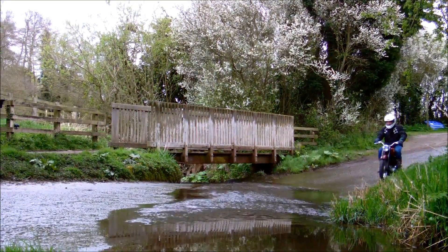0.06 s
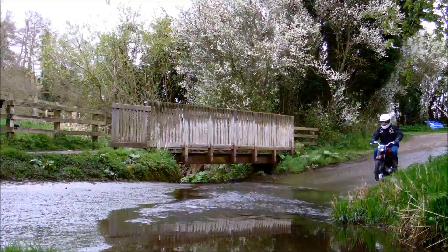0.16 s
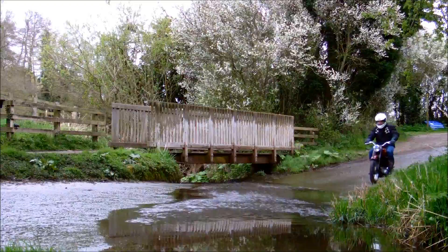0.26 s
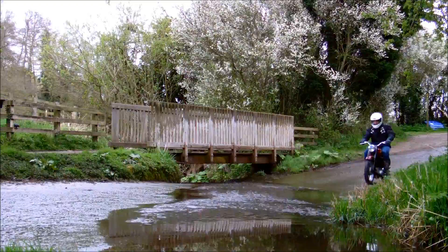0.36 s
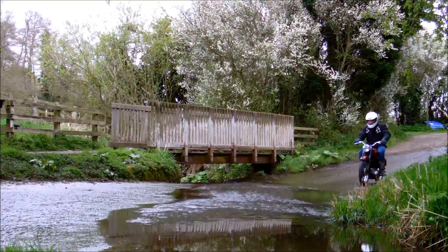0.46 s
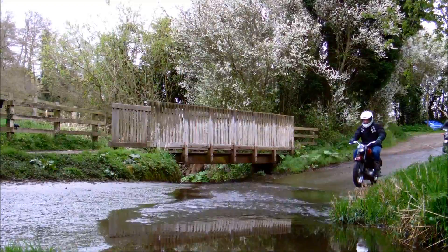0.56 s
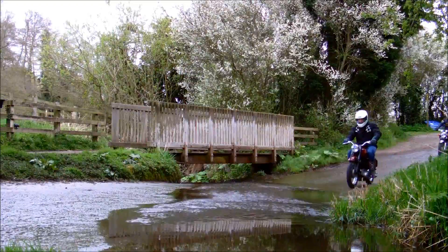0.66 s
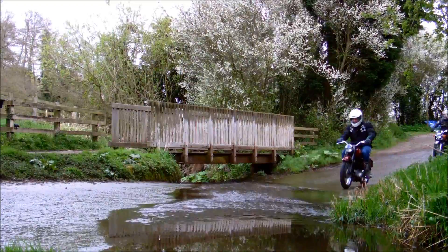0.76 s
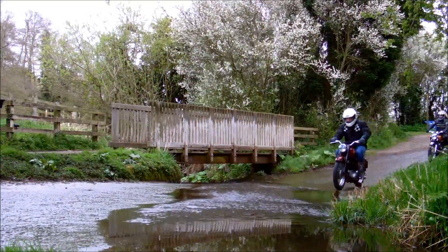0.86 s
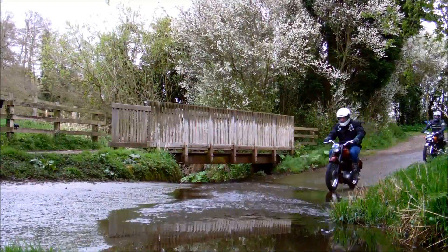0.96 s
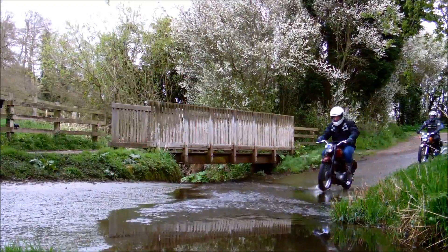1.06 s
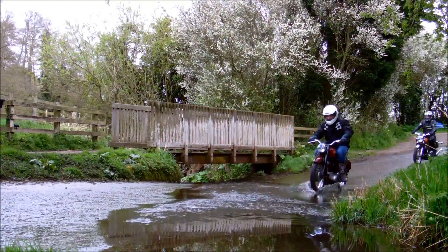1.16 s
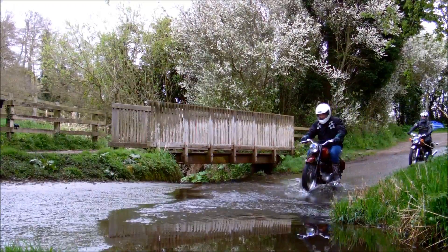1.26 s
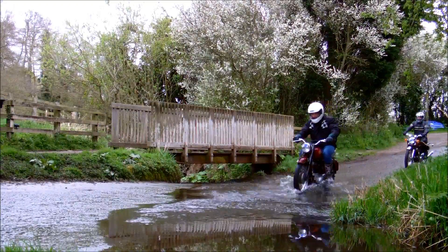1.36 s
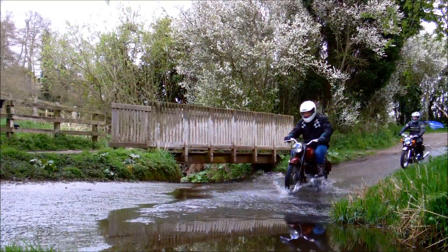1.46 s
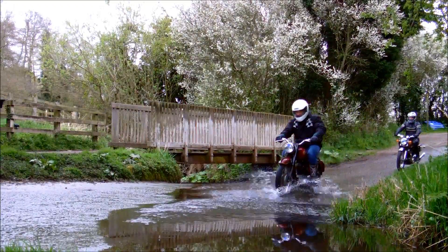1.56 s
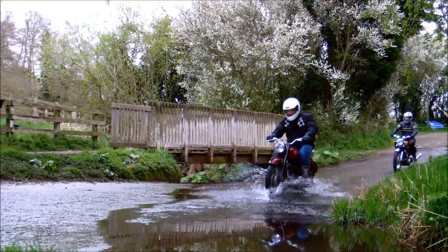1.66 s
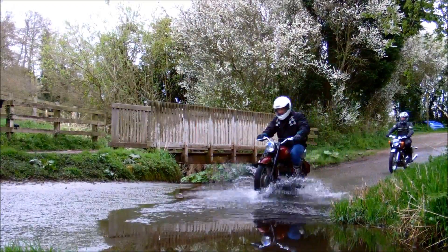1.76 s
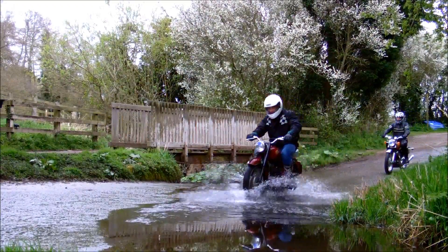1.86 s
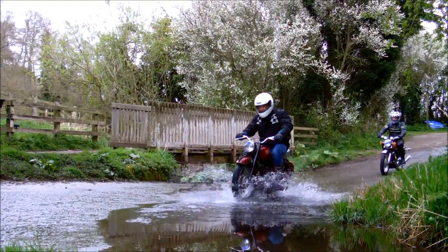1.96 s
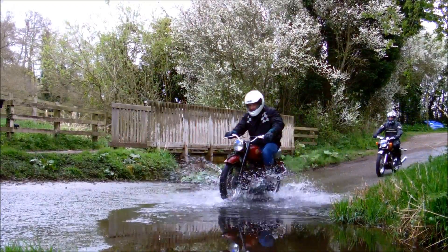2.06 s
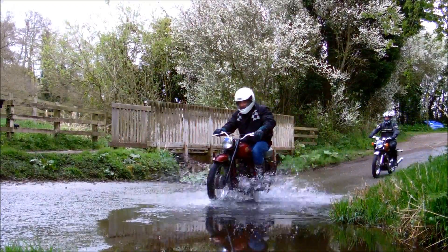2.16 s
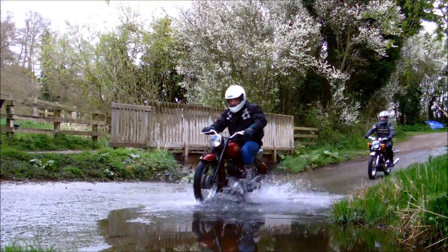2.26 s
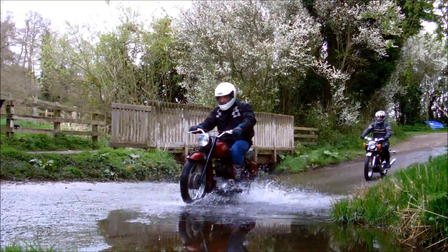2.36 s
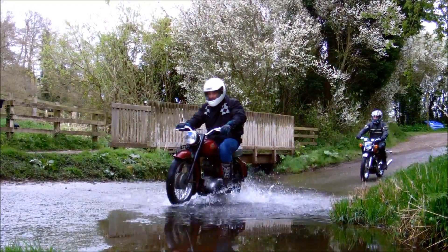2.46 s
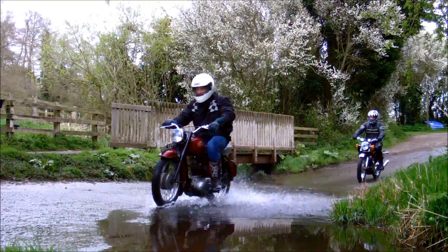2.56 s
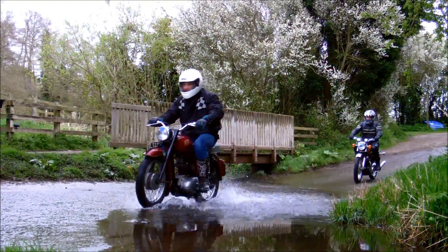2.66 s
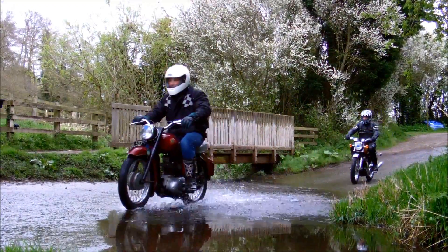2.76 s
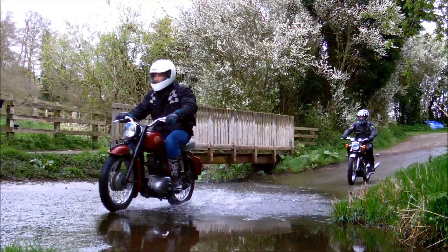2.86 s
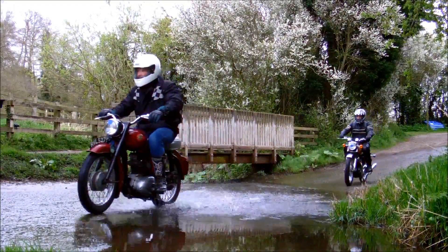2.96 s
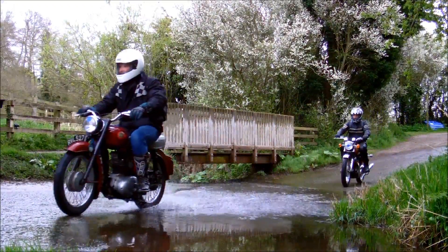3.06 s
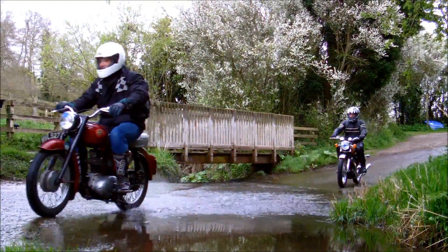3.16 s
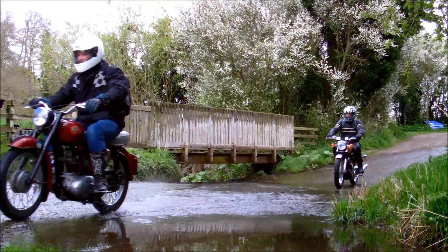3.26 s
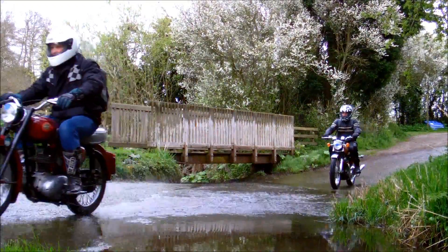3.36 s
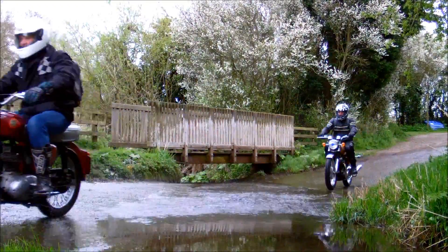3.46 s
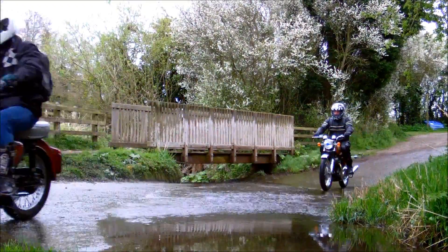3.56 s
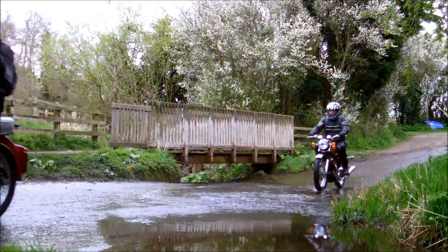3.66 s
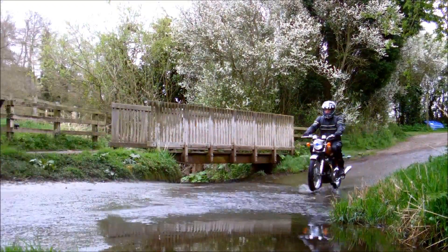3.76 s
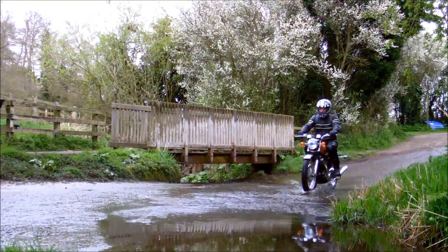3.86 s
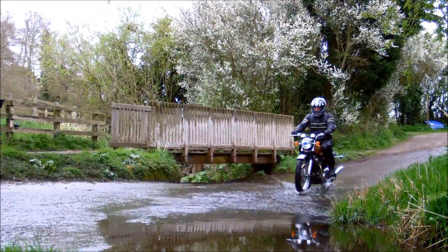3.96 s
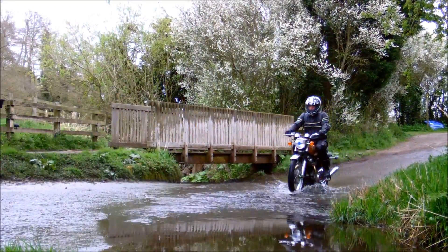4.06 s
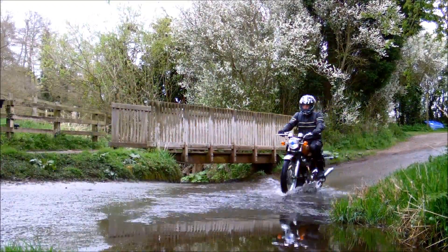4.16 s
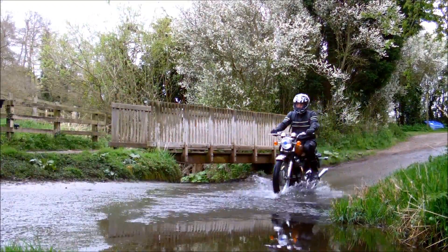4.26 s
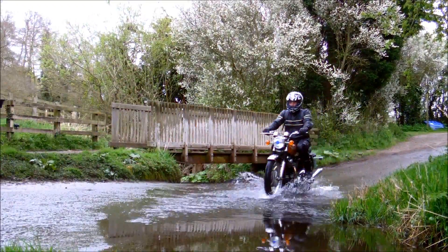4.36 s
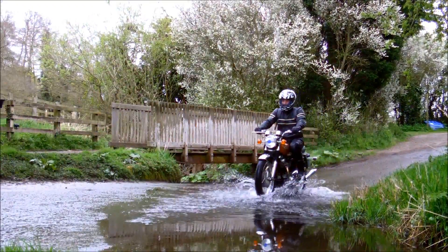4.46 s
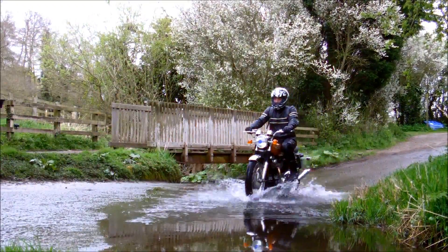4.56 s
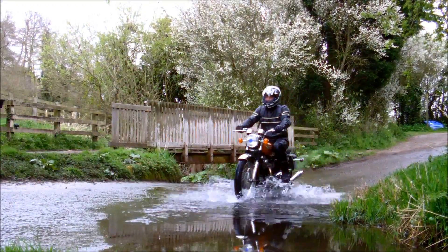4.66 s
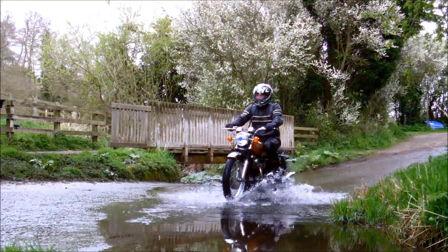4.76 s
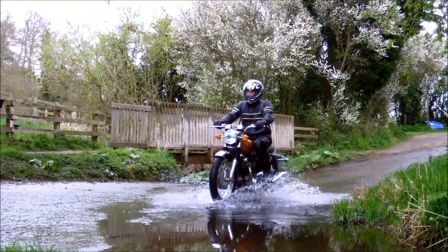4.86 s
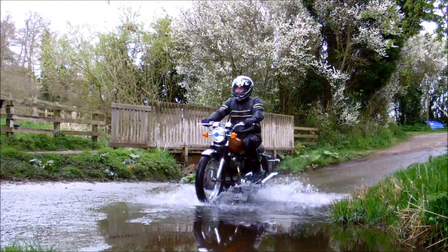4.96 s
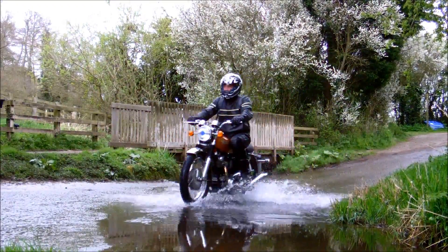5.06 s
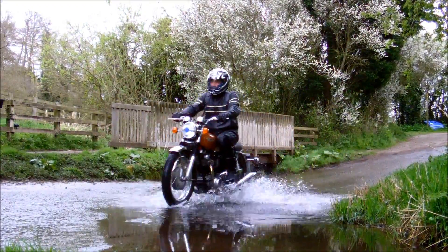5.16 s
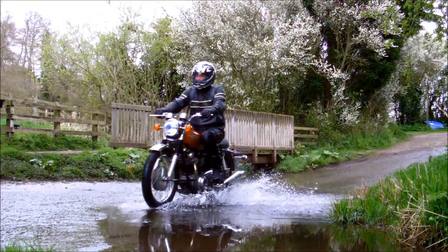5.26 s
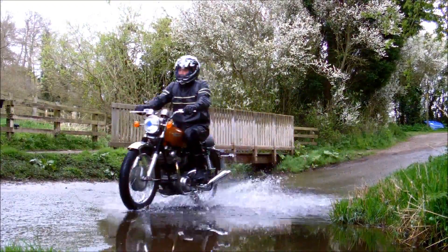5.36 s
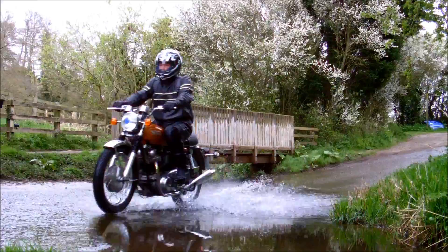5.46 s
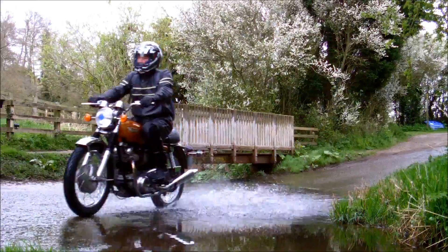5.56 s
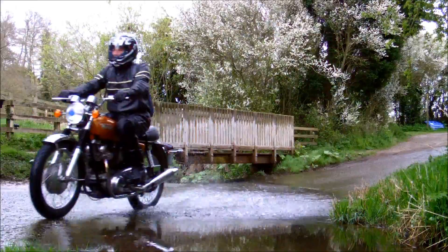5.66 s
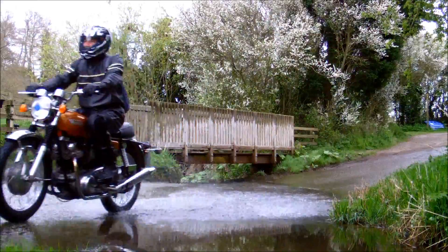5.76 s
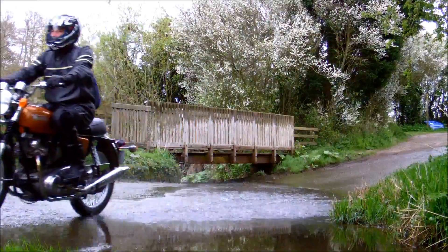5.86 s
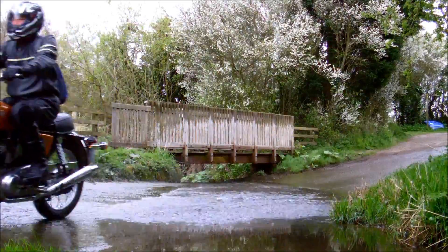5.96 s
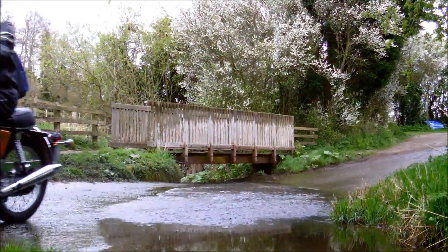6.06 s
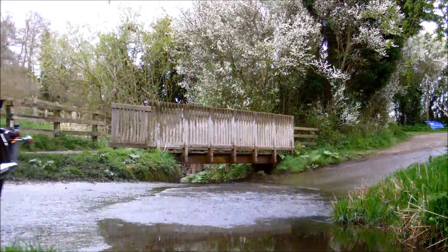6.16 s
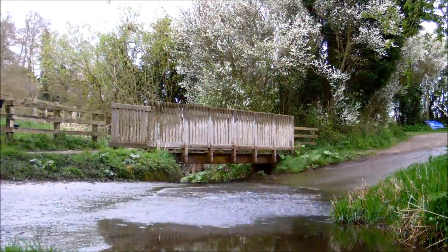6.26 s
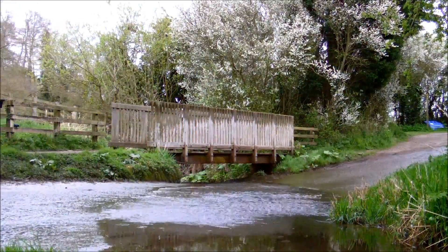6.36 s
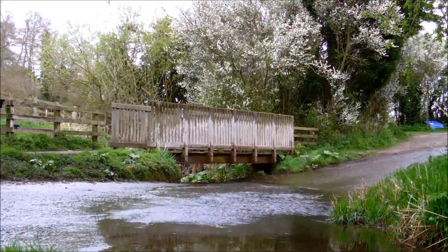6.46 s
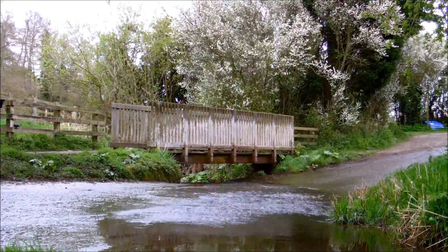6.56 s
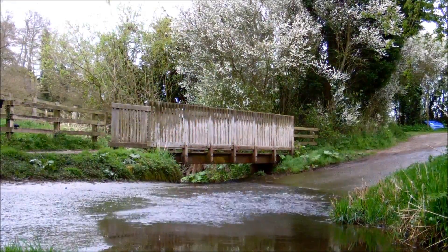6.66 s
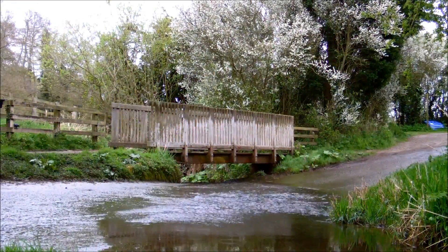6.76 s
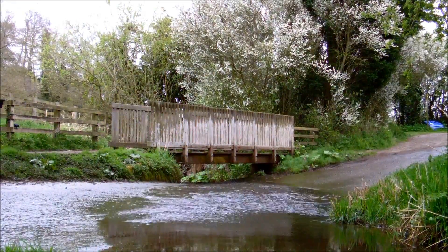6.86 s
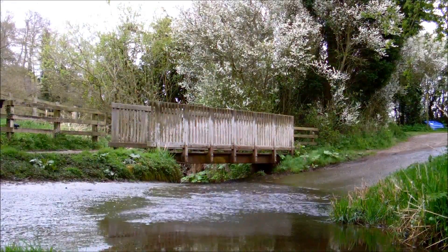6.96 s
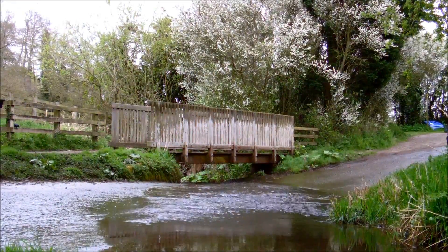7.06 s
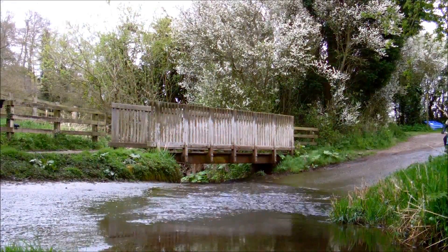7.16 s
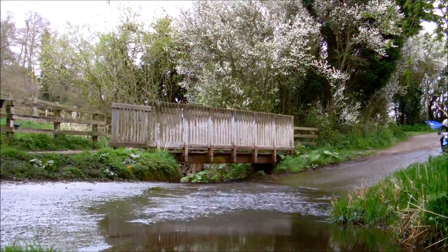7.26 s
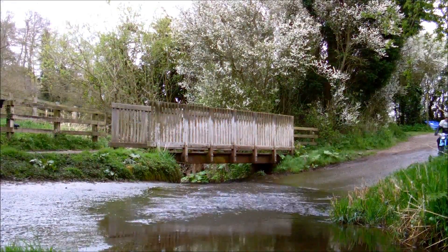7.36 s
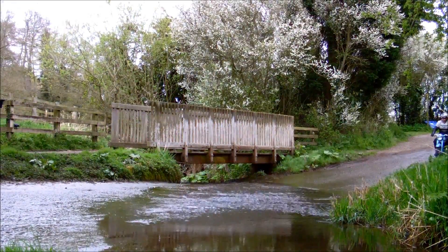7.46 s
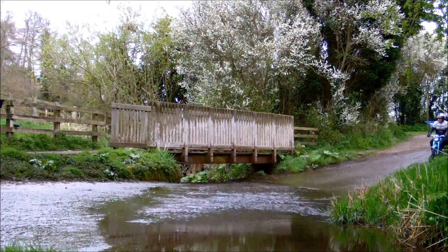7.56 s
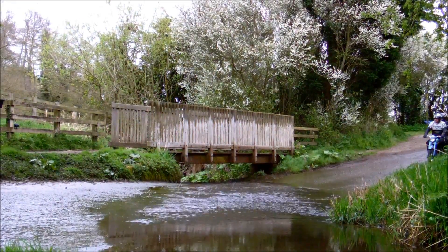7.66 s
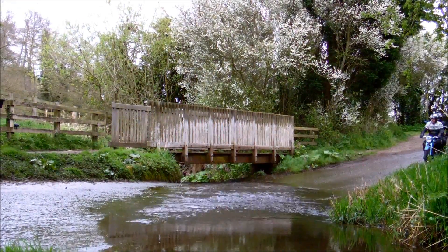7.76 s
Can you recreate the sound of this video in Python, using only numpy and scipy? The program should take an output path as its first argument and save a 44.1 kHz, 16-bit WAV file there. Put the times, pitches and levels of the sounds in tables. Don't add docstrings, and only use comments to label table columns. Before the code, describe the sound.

A shallow stream crossing outdoors, heard through a small, bright, bass-poor microphone. From 0 to 2.5 s, a light water hiss with occasional tiny drop ticks lies over the dry, regular valve rattle of a slow motorcycle approaching head on, about nineteen beats per second, briefly sagging near 2.5 s. Spray swells to its fullest around 3.3-4.5 s. From about 3.1 s the exhaust opens into crisp, fluttering cracks, with ringing casings, a hollow silencer tone and faint gear whine as it passes, speeding up and fading by 6.5 s. A second motorcycle enters at 5 s, slower and harder. Fine mist hisses past near 6.1 s; its uneven, sharp pops peak around 6.3-6.7 s, quicken towards twenty-six beats per second, surge again near 7.4 s, then weaken towards 7.8 s as spray thins. Strong blasts make the background dip momentarily.

```python
import sys
import numpy as np
from scipy import signal
from scipy.fft import rfft, irfft, next_fast_len
from scipy.io import wavfile
from scipy.ndimage import uniform_filter1d

SR = 44100
rng = np.random.default_rng(int(sys.argv[2]) if len(sys.argv) > 2 else 0)


def digitize_waveform(pressure):
    field = np.atleast_2d(pressure).T
    bounded = np.clip(field, -1, 1)
    quanta = np.round(bounded * 32767).astype(np.int16)
    wavfile.write(sys.argv[1], SR, quanta)


def field_ratio(decibels):
    return 10 ** (np.asarray(decibels, dtype=float) / 20)


N = 343980
T = np.arange(N) / SR

# time in seconds, firings per second.
FIRST_SPEED = [(0, 18.89), (.5, 19.17), (.85, 17.87), (1.15, 19.34), (1.5, 18.3), (2.0, 20.21),
               (2.55, 14.88), (3.2, 21.26), (3.8, 20.69), (4.2, 23.04), (5, 24.9), (6.1, 27.47)]
# time in seconds, firings per second.
SECOND_SPEED = [
    (4.9, 15.5),
    (5.5, 19.42),
    (5.75, 19.04),
    (6.0, 20.47),
    (6.3, 20.66),
    (6.6, 22.06),
    (7, 23.36),
    (7.4, 24.99),
    (7.79, 26.06),
]
# time in seconds, sizzle in dB, body in dB, odd cylinder over the mean in dB.
SECOND_CRACK = [
    (5.2, -50, -33, 3),
    (5.4, -44, -17, 1.5),
    (5.7, -24, -16, 2),
    (6.1, -23, -12.5, 1.5),
    (6.35, -22, -14, 9.5),
    (6.55, -12.5, -8.5, 1.5),
    (6.95, -17, -12.5, 4),
    (7.2, -23.5, -17.5, 11),
    (7.45, -16, -15, 4),
    (7.8, -25, -21, 2.5),
]
FIRST_START, SECOND_START = .891, 1.61


def level(x, db):
    return x * field_ratio(db) / np.sqrt(np.mean(x ** 2))


def columns(table):
    s, *cols = np.transpose(table)
    return [np.interp(T, s, c) for c in cols]


def ring(x, modes):
    total = 0
    for k, (hz, width_hz, db) in enumerate(modes):
        b, a = signal.iirpeak(hz, hz / width_hz, SR)
        total = total + (-1) ** k * field_ratio(db) * signal.lfilter(b, a, x)
    return total


def band(x, lo_hz, hi_hz):
    sos = signal.butter(2, [lo_hz, min(hi_hz, .45 * SR)], "band", fs=SR, output="sos")
    return signal.sosfilt(sos, x)


def walk(rate_hz):
    hold = int(SR / rate_hz)
    steps = np.repeat(rng.standard_normal(N // hold + 1), hold)
    return 1.22 * uniform_filter1d(uniform_filter1d(steps, hold), hold)[:N]


def noise():
    return rng.standard_normal(N)


def fade(start_s, end_s):
    return np.clip((T - start_s) / (end_s - start_s), 0, 1)


def crank(table, start):
    turns = np.cumsum(columns(table)[0]) / SR
    return start + turns - turns[int(table[0][0] * SR)]


def beats(turns, scatter_db):
    cycle = np.floor(turns).astype(int) + 2
    size = field_ratio(scatter_db * rng.standard_normal(256))[cycle]
    pulse = size * (np.diff(cycle, prepend=cycle[0]) > 0)
    return pulse, turns % 1, size


def puff(phase, size, width):
    return size * phase / width * np.exp(1 - phase / width)


def first_bike():
    # time in seconds, exhaust in dB, valve rattle in dB.
    loudness = [(0, -70, -41.5), (.25, -79, -36.5), (1.0, -80, -32), (1.3, -80, -38.5), (1.9, -84, -34),
                (2.4, -89, -32), (2.65, -65, -61), (3.0, -57.5, -31), (3.2, -56.5, -32.5),
                (3.9, -55, -29.5), (4.5, -55.5, -49), (5.0, -53.5, -41), (5.4, -60, -33), (5.8, -56, -27),
                (6.2, -58, -24.5)]
    # time in seconds, share of a cycle after the firing.
    valve_lag = [
        (0, 0.33),
        (.35, 0.43),
        (.6, 0.54),
        (1.2, 0.55),
        (2.6, 0.55),
        (6.2, 0.494),
    ]
    # frequency in Hz, width in Hz, level in dB.
    pipe_modes = [(144, 26, 5), (228.7, 20, 0), (90, 40, -15), (252.7, 24, 0)]
    # frequency in Hz, width in Hz, level in dB.
    tail_modes = [(518, 110, 3), (630, 76, 0)]
    # start in seconds, end in seconds, frequency in Hz, width in Hz, level in dB.
    casing = [(.2, 1.3, 4420, 70, -48), (-.3, 1.3, 2880, 60, -55), (-.3, 1.1, 2250, 50, -60),
              (1.2, 2.6, 2880, 140, -45), (1.35, 2.5, 2610, 60, -51), (1.2, 2.45, 1764, 130, -48),
              (2.55, 4.3, 4420, 110, -35), (2.85, 3.7, 2555, 120, -36), (3.0, 3.65, 1150, 28, -44),
              (3.15, 3.85, 3830, 100, -35), (3.85, 4.3, 2620, 80, -35), (3.8, 4.65, 2880, 170, -30),
              (3.9, 4.2, 2270, 66, -44), (4.0, 4.39, 1750, 75.6, -43.5), (4.2, 4.55, 1516, 69, -40),
              (3.76, 4.34, 1020, 86, -41), (4.85, 5.36, 1010, 60, -42), (4.0, 4.7, 4280, 200, -34)]

    turns = crank(FIRST_SPEED, FIRST_START)
    lag, = columns(valve_lag)
    thump_db, rattle_db = columns(loudness)
    pipe_db = thump_db + 16 - 14 * fade(4.23, 4.9)
    off_s = T - 4.4
    off_db = np.where(off_s < 0, 20, -16) * off_s
    silencer_db = np.maximum(-34 + off_db, -85)

    fire, phase, size = beats(turns + .14, scatter_db=.8)
    valve, valve_phase, valve_size = beats(turns + .1 - lag, scatter_db=1.2)
    gate = 0.6 * puff(phase, size, 0.095) + puff(valve_phase, valve_size, 0.094) + 0.49

    thump = level(ring(fire + .2 * valve, pipe_modes), 6)
    pipe = level(ring(valve + 0.46 * fire, [(400, 55, -2.5), (450, 26, -3.5), (554, 140, -21)]), 0)
    gas = level(band(gate * noise(), 340, 600), -12)
    blow = level(fire + 0.31 * valve, 0) + .5 * gate * noise()
    silencer = level(ring(blow, [(789, 123, 1.7), (561, 80, 0.64)]), 1)

    gear = field_ratio(4.7 * walk(25.01)) * np.sin(2 * np.pi * 32 * turns + .6 * walk(60))
    box_gain = 0.22 + np.sin(np.pi * fade(4.06, 4.86))
    silencer = silencer + box_gain * ring(gear, [(788, 76, 1.1)])

    ticks = fade(0.38, 3.3) * puff(phase, size, 0.19) + puff(valve_phase, valve_size, 0.13)
    rattle = band(ticks * field_ratio(2.9 * walk(400)) * noise(), 4330, 6400)
    rattle = level(band(rattle, 3800, 6400), -9)

    bike = field_ratio(thump_db) * thump + field_ratio(pipe_db) * (pipe + gas)
    bike = bike + field_ratio(silencer_db) * silencer + field_ratio(rattle_db) * rattle
    bike = bike + field_ratio(-57 + 0.35 * (thump_db + 73)) * gear
    bike = bike + np.sin(np.pi * fade(4.3, 5.73)) * level(ring(fire + 0.23 * valve, tail_modes), -42)
    for start_s, end_s, hz, width_hz, db in casing:
        facing = np.abs(np.sin(np.pi * fade(start_s, end_s))) ** .5 * (T < end_s)
        bike = bike + facing * level(ring(gate * noise(), [(hz, width_hz, 0)]), db)
    return bike * (1 - fade(5.86, 6.57))


def second_bike():
    # time in seconds, exhaust in dB.
    loudness = [
        (5.1, -57.5),
        (5.32, -60.5),
        (5.77, -57.5),
        (6.1, -54),
        (6.67, -53),
        (7.35, -52),
        (7.8, -55.5),
    ]
    # frequency in Hz, width in Hz, level in dB.
    thump_modes = [(145, 140, 1), (259, 67, 1), (65, 50, -2)]
    # frequency in Hz, width in Hz, level in dB.
    pipe_modes = [(444, 177, -4), (767, 105, -2.5), (1050, 174, -7)]

    turns = crank(SECOND_SPEED, SECOND_START)
    thump_db, = columns(loudness)
    pipe_db = thump_db + 14 - 3 * (T - loudness[0][0])
    rattle_db = -25 + 0.88 * (thump_db - thump_db.max())
    fire, phase, size = beats(turns + .1, scatter_db=1.0)
    _, valve_phase, valve_size = beats(turns + .43, scatter_db=1.5)
    gas = puff(phase, size, 0.062) + 0.63

    spit = level(band(gas * noise(), 40, 190), -7)
    thump = level(ring(fire, thump_modes), 0) + spit
    pipe = level(ring(0.45 * level(fire, 0) + gas * noise(), pipe_modes), 2.75)
    ticks = puff(valve_phase, valve_size, .21) * field_ratio(1.3 * walk(300))
    rattle = level(band(ticks * noise(), 3500, 9400), -5) * field_ratio(-8 * fade(6.8, 7.2))
    bike = field_ratio(thump_db) * thump + field_ratio(pipe_db) * pipe + field_ratio(rattle_db) * rattle
    return bike * fade(4.98, 5.15)


def firings(turns, table):
    # time in seconds, level over the usual in dB.
    odd_firings = [(3.239, -4), (3.286, -10), (3.571, -25), (3.715, -7), (3.906, -4), (4.002, -2),
                   (4.223, 0.5), (4.308, 0), (4.688, -15), (4.732, -4), (4.891, 10), (4.972, -3),
                   (5.095, -7), (5.336, 6), (5.698, -10), (5.756, 1), (5.859, 3.5), (6.247, -1),
                   (6.302, 13.5), (6.398, 4), (6.49, 9), (6.67, 2.5), (6.804, 4), (7.021, 2.5), (7.145, -4),
                   (7.228, -1), (7.39, 1.5), (7.51, 3.5), (7.705, -7), (7.782, 3)]
    lag_ms, even_late_ms, crack_ms, scatter_db = 1.5, 2.2, 6.68, 1

    cycle = np.floor(turns + .1)
    fires = np.diff(cycle, prepend=cycle[0]) > 0
    at = np.flatnonzero(fires & (T > table[0][0]) & (T < table[-1][0]))
    sizzle_db, body_db, odd_db = (c[at] for c in columns(table))
    even = 1 - cycle[at] % 2
    chance = rng.standard_normal((len(at), 4)).T
    pop_s, pop_db = np.transpose(odd_firings)
    popping = np.abs(T[at, None] - pop_s) < .012
    extra_db = (1 - 2 * even) * odd_db + popping @ pop_db

    s = T[at] + (lag_ms + even_late_ms * even * (odd_db > 0) + .5 * chance[0]) / 1000
    s = s + 2.5 / 1000 * (s > SECOND_CRACK[0][0]) * np.interp(s, (6.35, 6.45), (1, 0))
    return np.array([s,
                     sizzle_db + extra_db + scatter_db * chance[1],
                     body_db + 0.42 * extra_db + scatter_db * chance[2],
                     crack_ms * field_ratio(chance[3]),
                     np.clip(0.5 + 0.57 * extra_db, 0, 8)])


def blasts():
    # time in seconds, sizzle in dB, body in dB, odd cylinder over the mean in dB.
    first_crack = [
        (3.1, -45, -8, -1),
        (3.3, -29, -21, 0.5),
        (3.8, -25, -16, -0.5),
        (4.13, -19.5, -14, 0),
        (4.35, -20, -22, 1),
        (4.5, -25, -19.5, -2),
        (5.05, -29, -25, 5),
        (5.2, -43, -35, 2),
    ]
    # time in seconds, sizzle in dB, body in dB.
    late_burns = [
        (3.3734, -25, -14.5),
        (3.506, -24, -32),
        (5.8905, -24.5, -9.5),
        (6.191, -33, -12),
    ]
    strays = np.transpose([(*row, 6.68, 0.5) for row in late_burns])
    return np.hstack([firings(crank(FIRST_SPEED, FIRST_START), first_crack),
                      firings(crank(SECOND_SPEED, SECOND_START), SECOND_CRACK), strays])


def bursts(times_s, gains, lengths_ms, sag):
    gate = np.zeros(N + SR)
    for s, gain, ms in zip(times_s, gains, lengths_ms):
        share = np.linspace(0, 1, max(int(ms * SR / 1000), 20))
        shape = np.sin(np.pi * share) ** 0.5 * np.exp(-sag * share)
        gate[int(s * SR):][:len(share)] += gain * shape
    return gate[:N] * field_ratio(3 * np.tanh(walk(700)))


def cracks(pops):
    # low edge in Hz, high edge in Hz, level in dB.
    body_bands = [(540, 1840, -23), (2040, 4760, -14.5), (4080, 6700, -11.5), (6570, 11100, -14.5)]
    s, peak_db, body_db, ms, _ = pops
    ms = ms - 2.5 * np.maximum(s - 7, 0)

    sizzle = level(band(noise(), 7340, 10400), 4.54) + level(band(noise(), 11500, 25500), 2.1)
    sharp = bursts(s, field_ratio(peak_db), ms, sag=2.62)
    echo = np.sqrt(signal.lfilter([.002], [1, -.9985], sharp ** 2))
    crack = sharp * sizzle
    tilt_db = 3.5 * rng.standard_normal((len(s), 4)).T
    tilt_db[2] = 0
    for tilt, (lo_hz, hi_hz, db) in zip(tilt_db, body_bands):
        gate = bursts(s, field_ratio(body_db + tilt), ms, sag=0.49)
        crack = crack + gate * level(band(noise(), lo_hz, hi_hz), db)
    return crack + echo * level(band(noise(), 6300, 9800), -7.5)


def water():
    # time in seconds, spray in dB.
    wheels = [(0, -40.5), (.7, -38.5), (1.0, -36.5), (1.5, -35), (2.0, -32.5), (2.3, -29), (2.8, -26.5),
              (3.3, -23), (3.7, -22.5), (4.4, -23), (4.6, -23.5), (5.0, -25), (5.8, -26), (6.0, -30.5),
              (6.8, -32), (7.55, -36), (7.8, -36.5)]
    # time in seconds, peak in dB.
    falling = [
        (0.2414, -36),
        (0.2733, -42),
        (0.7036, -37),
        (1.1528, -36),
        (2.0787, -43),
        (2.4643, -33),
        (2.8504, -46),
    ]
    spray_db, = columns(wheels)
    over_db = spray_db + 30
    wash_db = -18 - 0.041 * over_db
    trail = np.exp(-((T - 6.1) / 0.38) ** 2)
    mist_db = -21.5 + 0.17 * over_db + 10 * trail

    grains = field_ratio(4.0 * np.minimum(rng.exponential(size=N), 5)) * (rng.random(N) < .06) * noise()
    hiss = level(grains, -7.5) + level(noise(), 1.5)
    surge_db = 0.55 * walk(30) + 1.5 * walk(150)
    spray = level(band(hiss, 2360, 6540), -4.5) * field_ratio(surge_db + 0.84 * walk(12))
    wash = level(band(band(hiss, 363, 1790), 357, 2280), 2.86)
    wash = wash * field_ratio(wash_db + 0.8 * surge_db + walk(12))
    fine = level(band(hiss, 5330, 9460), 6.6)
    fine = fine + level(band(band(noise(), 14000, 16000), 14000, 16000), 3.1)
    mist = fine * field_ratio(mist_db + surge_db)

    s, peak_db = np.transpose(falling)
    drops = bursts(s, field_ratio(peak_db), np.full(len(s), 3.0), sag=1.1)
    drops = drops * level(band(noise(), 4000, 16000), 6.5)
    low_rumble = level(band(noise(), 23, 131), -37) * field_ratio(0.65 * spray_db + 12 * fade(3.9, 8.4))
    stream = level(band(hiss, 750, 1450), -57.5) * field_ratio(walk(7.9))
    return field_ratio(spray_db) * (spray + wash + mist) + drops + low_rumble + stream


def limiter(pops, release_s=.028):
    s, _, _, ms, dip_db = pops
    kicks = np.zeros(N + SR)
    kicks[((s + ms / 1000) * SR).astype(int)] = np.minimum(np.abs(dip_db), 8)
    dip = signal.lfilter([1], [1, -np.exp(-1 / (release_s * SR))], kicks[:N])
    return field_ratio(-uniform_filter1d(dip, size=40))


def scene():
    pops = blasts()
    mix = first_bike() + second_bike() + cracks(pops) + water()
    return (mix * limiter(pops))[None]


def band_limit(x):
    return signal.sosfilt(signal.butter(12, 16650, fs=SR, output="sos"), x)


def record(dry):
    # frequency in Hz, gain in dB.
    mic = [(30, -36), (60, -34), (120, -11.5), (250, -2), (600, -4), (1400, -1), (2600, 0), (4300, 3.5),
           (5500, 12.5), (6300, 1.5), (7500, -8.5), (9000, -15), (12600, -9), (14800, -14)]
    # frequency in Hz, width in Hz.
    notches = [
        (299, 115),
        (900, 118),
    ]
    clip = .8
    size = next_fast_len(N)
    hz, db = np.transpose(mic)
    bin_hz = np.arange(size // 2 + 1) * SR / size
    colour = field_ratio(np.interp(np.log(bin_hz + 1), np.log(hz), db))
    x = irfft(rfft(dry, size) * colour, size)[:, :N]
    for notch_hz, width_hz in notches:
        b, a = signal.iirnotch(notch_hz, notch_hz / width_hz, SR)
        x = signal.lfilter(b, a, x)
    x = x / (1 + (x / clip) ** 4) ** .25
    x = signal.sosfilt(signal.ellip(8, .2, 30, 15450, fs=SR, output="sos"), x)
    return band_limit(x)


dry = scene()
out = record(dry)
digitize_waveform(out)
```